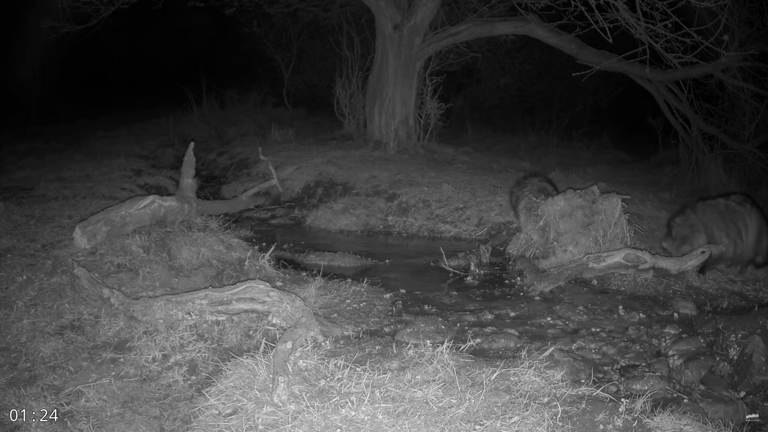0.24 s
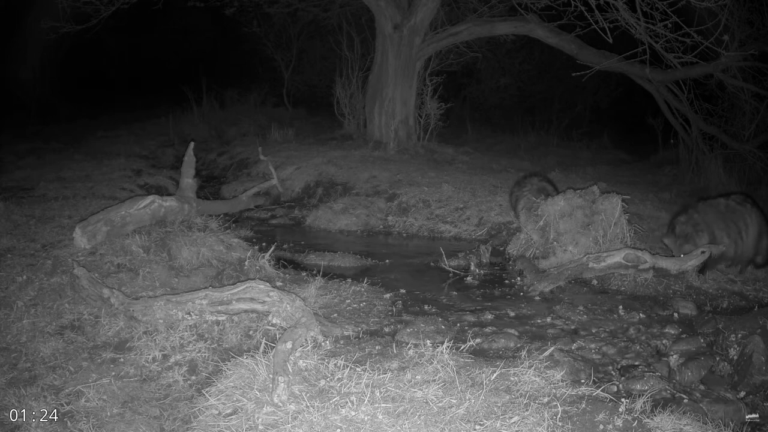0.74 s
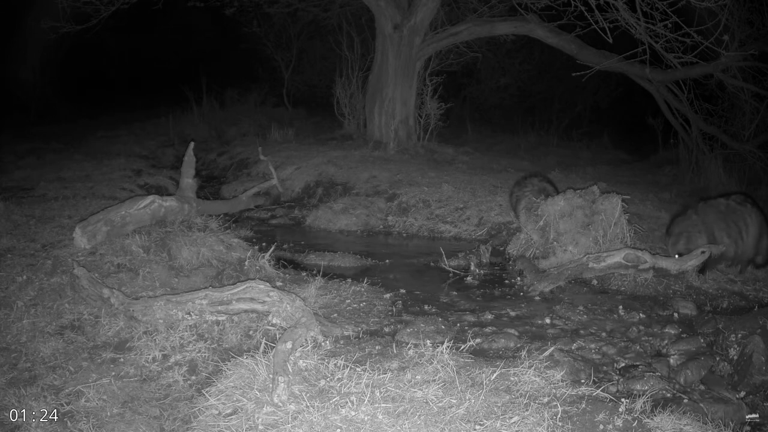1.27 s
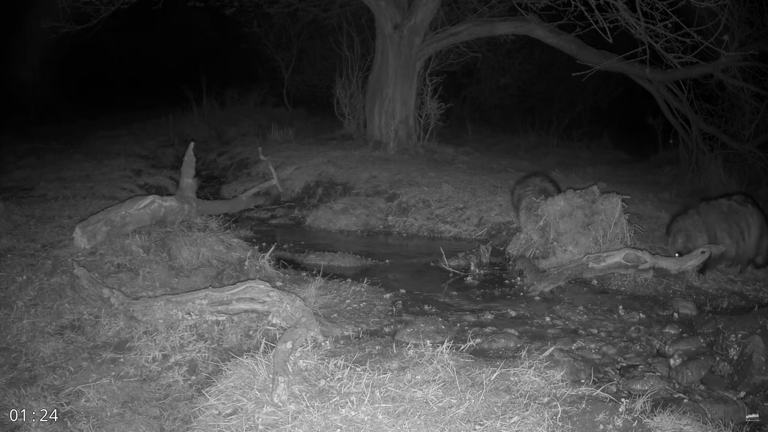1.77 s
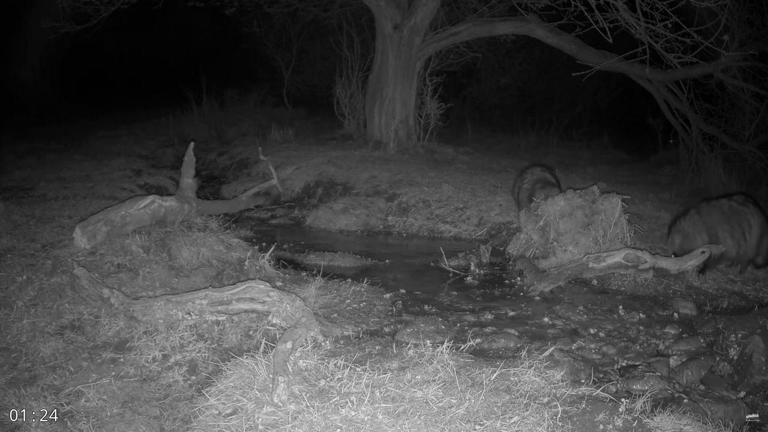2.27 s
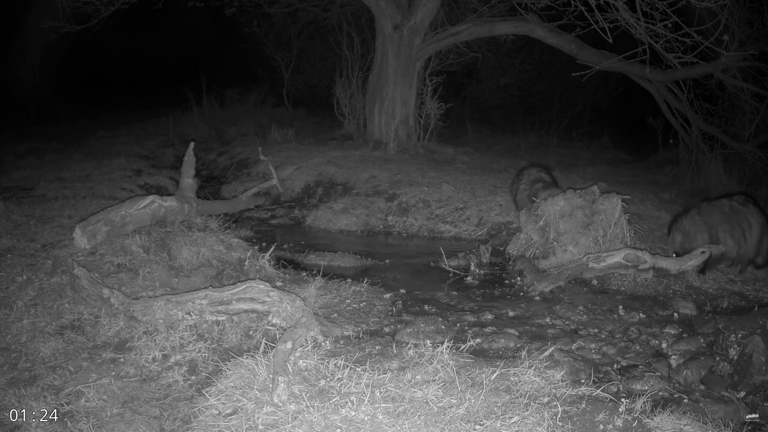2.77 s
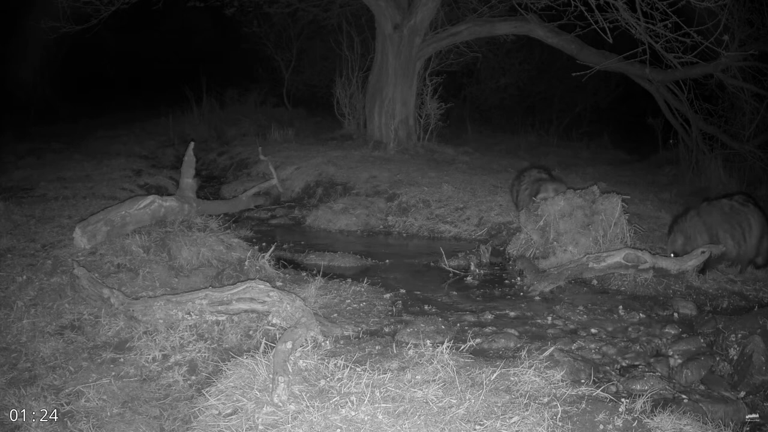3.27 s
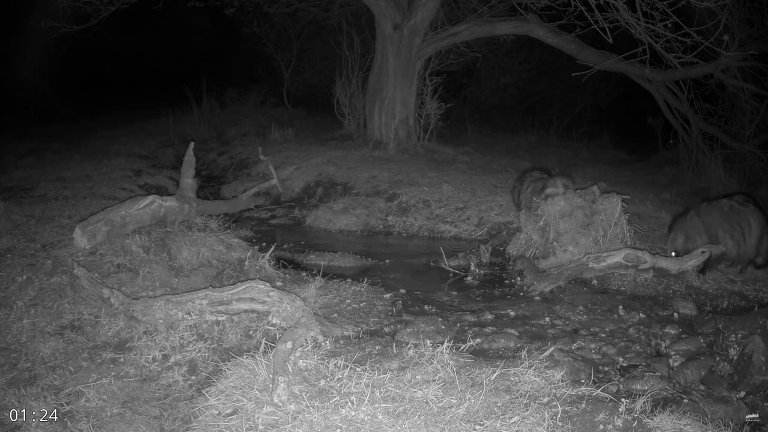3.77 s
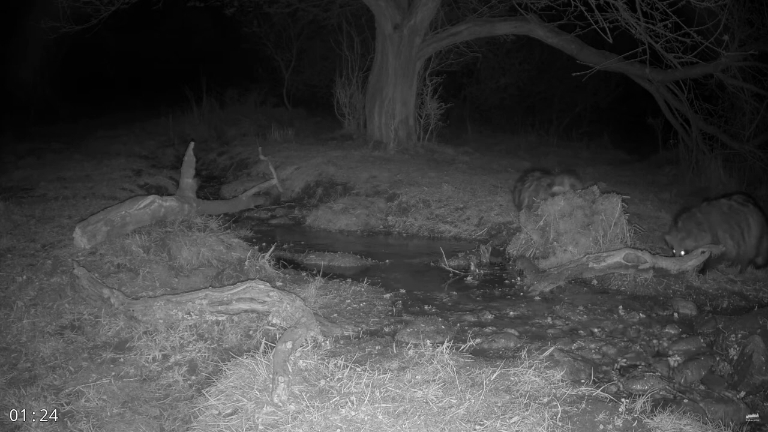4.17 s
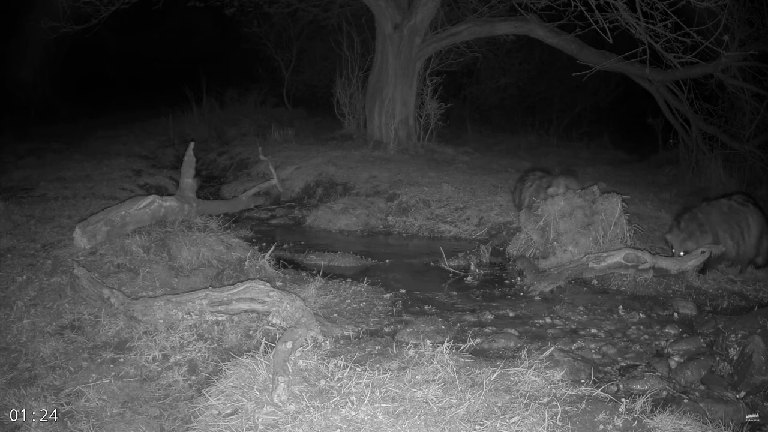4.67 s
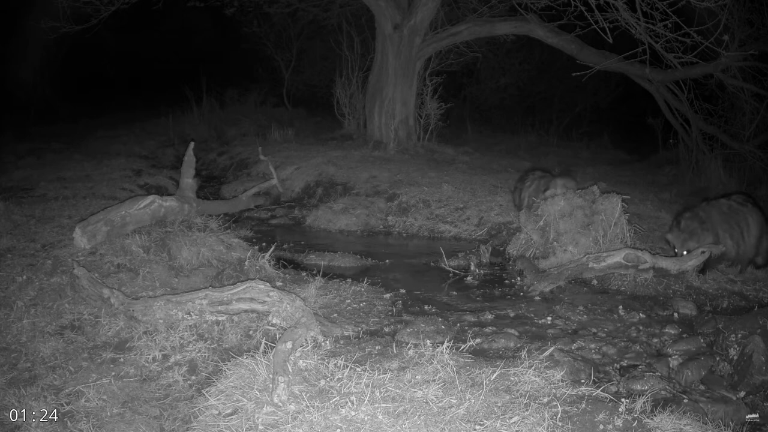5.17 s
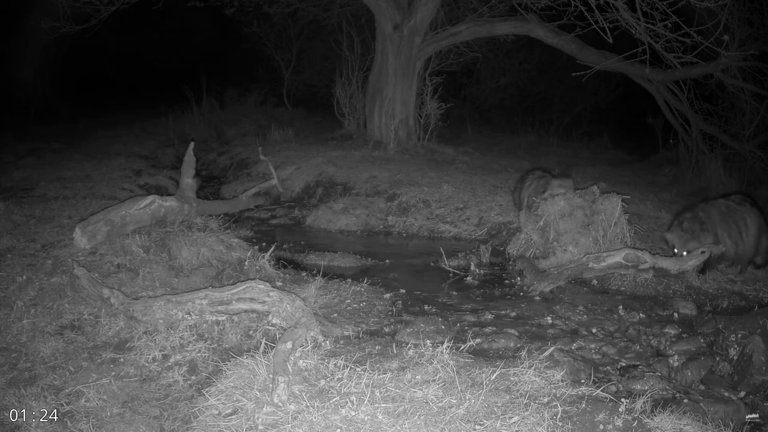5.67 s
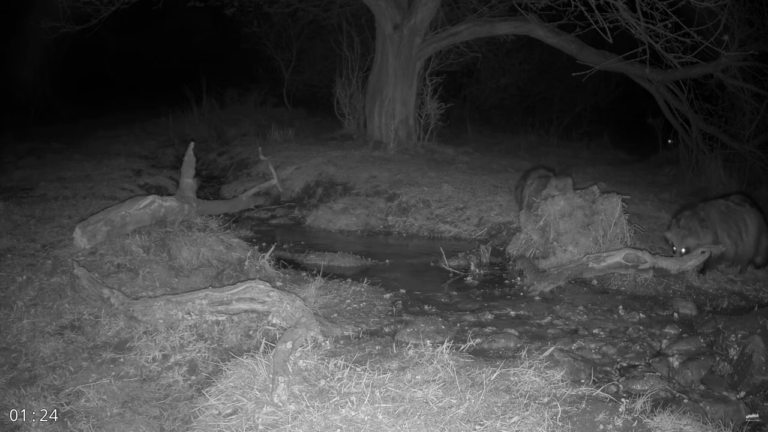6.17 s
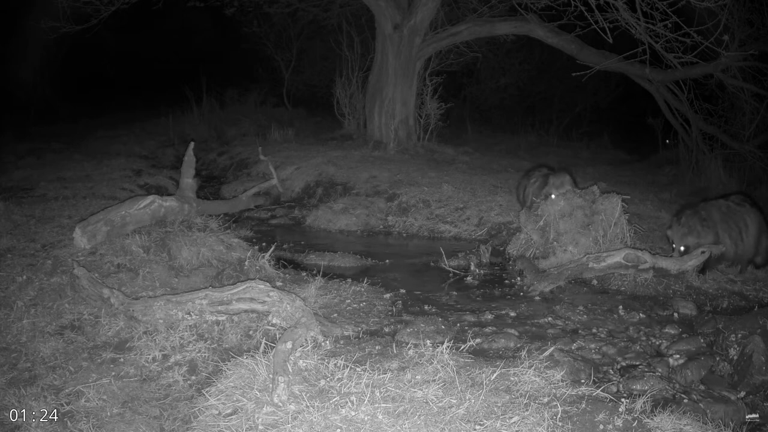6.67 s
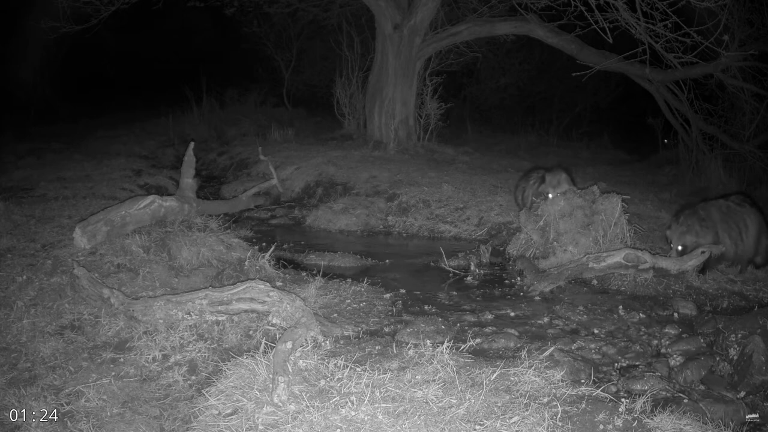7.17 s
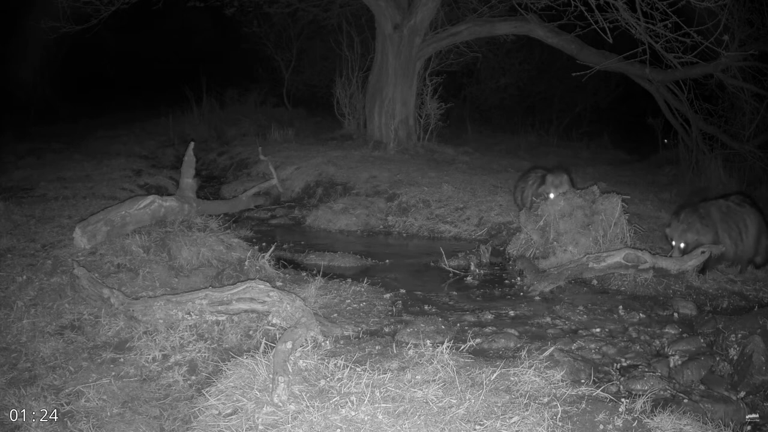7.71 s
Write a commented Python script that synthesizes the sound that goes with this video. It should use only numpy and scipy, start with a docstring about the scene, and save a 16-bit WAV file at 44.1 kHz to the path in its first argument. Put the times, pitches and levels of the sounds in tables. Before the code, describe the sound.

Near, dry-sounding mono capture of a night pool. Watery bubbles chirp and plop constantly, some dull and hollow, others bright and clicking. Drinking animals add muted laps, wet spits and low thuds, with the strongest slap around five and a half seconds, plus three brief climbing swallows. The stony banks return only a very short dull tail, and soft air noise and microphone hiss stay underneath.

```python
"""A small creek trickles over stones at night: trapped air bubbles ring as short dying tones over fine babble.
Animals drink from a pool near the microphone: tongues slap the water, with low pushes, splashes and spits.
Three swallows climb in pitch by overlapping steps and end in short bursts; bursting films tick as noise puffs.
Stones and banks return a short dull tail, and night air and microphone hiss lie behind as shaped noise."""
import sys
import numpy as np
from scipy import signal
from scipy.io import wavfile
from scipy.ndimage import uniform_filter1d

SR = 44100
rng = np.random.default_rng(int(sys.argv[2]) if len(sys.argv) > 2 else 0)


def rack_gain(trim_db):
    """Turn a fader trim in dB into the linear factor to multiply a signal by."""
    fader = np.asarray(trim_db, float)
    return 10 ** (fader / 20)


def unload_wav(signal):
    """Save mono or channel-first audio to the path in sys.argv[1] as 16-bit WAV at rate SR, clipped to [-1, 1]."""
    wavfile.write(
        sys.argv[1],
        SR,
        np.round(np.clip(np.atleast_2d(signal).T, -1, 1) * 32767).astype(np.int16),
    )


N = 350154  # length in samples


def read(points, hz):
    """Straight lines between points on a log-frequency axis."""
    f, value = np.transpose(points)
    return np.interp(np.log(hz + 1), np.log(f + 1), value)


def evened(x):
    """Scales to rms 1."""
    return x / np.sqrt(np.mean(x ** 2) + 1e-20)


def smoothed_twice(x, samples):
    """Two running means, for a smooth random wander at rms 1."""
    return evened(uniform_filter1d(uniform_filter1d(x, samples), samples))


def add(mix, start_s, sound):
    """Mixes a sound in at its start time."""
    part = mix[round(start_s * SR):][:len(sound)]
    part += sound[:len(part)]


def band(x, lo_hz, hi_hz):
    """Band-pass filter."""
    return signal.sosfilt(signal.butter(3, [lo_hz, hi_hz], "band", fs=SR, output="sos"), x)


def bubble(hz, t60, rise=0.012, pinch_db=-20, onset_s=0.00051):
    """A dying tone that drifts in pitch, by default up as the bubble nears the surface, led by a pinch-off click."""
    t = np.arange(round(t60 * SR) + 64) / SR
    swell = 1 - np.exp(-t / onset_s)
    fade = rack_gain(-60 * t / t60)
    tone = np.sin(2 * np.pi * hz * t * (1 + rise * t / t60)) * fade * swell
    u = t / 0.00005
    click = (1 - u) * np.exp(-u)
    return tone + rack_gain(pinch_db) * click


# the loudest bubbles in the creek, levels before the waver: [start_s, level_db, pitch_hz, t60_s]
LOUD_BUBBLES = [(0.0787, -37, 1034, 0.037), (0.1134, -29, 1516, 0.041), (0.2044, -37, 1436, 0.033),
                (0.2517, -36, 1018, 0.054), (0.279, -28, 4100, 0.0051), (0.3273, -32, 4720, 0.0081),
                (0.547, -25.5, 1007, 0.02), (0.587, -31.5, 1437, 0.059), (0.624, -41, 3360, 0.013),
                (0.6805, -42, 816, 0.23), (0.704, -35.5, 4340, 0.024), (0.718, -28, 1030, 0.0092),
                (0.8002, -33, 2250, 0.013), (0.9493, -36, 1584, 0.033), (1.008, -34, 866, 0.096),
                (1.072, -37.5, 914, 0.11), (1.177, -35, 1040, 0.044), (1.2065, -36.5, 800, 0.18),
                (1.372, -36.5, 1780, 0.03), (1.412, -34.5, 1014, 0.021), (1.4128, -37.5, 3470, 0.016),
                (1.6006, -31, 4260, 0.0064), (1.6766, -35, 1800, 0.02), (1.782, -30.5, 976, 0.05),
                (1.8274, -38, 2880, 0.014), (1.8837, -35.5, 1427, 0.05), (1.96, -33.5, 985, 0.039),
                (1.9787, -33, 1355, 0.031), (2.0256, -34.5, 4320, 0.014), (2.1374, -41.5, 2155, 0.06),
                (2.2034, -28.5, 800, 0.064), (2.247, -32, 4270, 0.01), (2.4293, -34, 2200, 0.014),
                (2.486, -36, 1600, 0.052), (2.5272, -31.5, 1500, 0.055), (2.574, -36, 850, 0.039),
                (2.737, -27, 1240, 0.0068), (2.915, -37, 1445, 0.076), (3.051, -29.5, 3730, 0.0075),
                (3.1035, -35, 4630, 0.009), (3.241, -38, 3050, 0.021), (3.27, -31, 1660, 0.026),
                (3.3582, -26.5, 1280, 0.0063), (3.481, -38.5, 1890, 0.028), (3.488, -27, 4130, 0.0046),
                (3.762, -35, 1437, 0.064), (3.839, -33, 3900, 0.011), (3.934, -41, 960, 0.036),
                (3.9748, -27, 1082, 0.039), (4.004, -37, 3540, 0.02), (4.0247, -34, 2980, 0.013),
                (4.046, -37, 4650, 0.0073), (4.189, -27.5, 866, 0.03), (4.234, -37, 2180, 0.016),
                (4.301, -36, 1770, 0.021), (4.456, -41.5, 1030, 0.07), (4.524, -37, 4700, 0.01),
                (4.5455, -26, 1380, 0.0063), (4.5869, -26, 830, 0.056), (4.6262, -36.5, 1740, 0.022),
                (4.6416, -24, 3260, 0.0045), (4.8312, -35, 3460, 0.0078), (4.8633, -28.5, 1580, 0.014),
                (4.9776, -31, 790, 0.16), (5.005, -29.5, 1640, 0.012), (5.2245, -41.5, 1493, 0.071),
                (5.224, -37.5, 3750, 0.012), (5.2864, -28, 3060, 0.0066), (5.412, -39.5, 984, 0.072),
                (5.512, -27.5, 1135, 0.026), (5.5329, -32, 1240, 0.027), (5.542, -27.5, 1460, 0.03),
                (5.543, -39.5, 838, 0.093), (5.554, -31.5, 2520, 0.015), (5.569, -41.5, 1077, 0.094),
                (5.7655, -23, 1200, 0.018), (5.769, -35, 1516, 0.077), (5.829, -41.5, 920, 0.091),
                (5.8494, -23, 1310, 0.0059), (5.901, -42.5, 1450, 0.082), (5.911, -39.5, 654, 0.04),
                (5.9275, -36, 1110, 0.032), (6.047, -46.5, 980, 0.063), (6.1443, -27.5, 1250, 0.012),
                (6.18, -31, 870, 0.014), (6.2629, -35.5, 1086, 0.099), (6.269, -27, 1620, 0.014),
                (6.288, -43, 1440, 0.044), (6.3186, -20.5, 990, 0.0048), (6.487, -42.5, 807, 0.054),
                (6.5286, -29, 1460, 0.0084), (6.6435, -26, 1340, 0.011), (6.745, -40, 940, 0.032),
                (6.896, -27, 1460, 0.056), (6.903, -31.5, 902, 0.04), (7.007, -36.5, 3730, 0.014),
                (7.009, -41, 1437, 0.11), (7.064, -35, 1583, 0.043), (7.1672, -34, 3700, 0.012),
                (7.2116, -33, 1028, 0.048), (7.3278, -35.5, 1500, 0.058), (7.373, -36.5, 804, 0.087),
                (7.49, -29.5, 1114, 0.021), (7.531, -27.5, 1660, 0.0073), (7.6223, -36.5, 3670, 0.016),
                (7.669, -41.5, 1446, 0.036), (7.7013, -31, 1587, 0.08), (7.719, -37.5, 3000, .015),
                (7.7435, -31.5, 3940, 0.0076), (7.767, -36, 4500, 0.0091), (7.857, -45, 2600, 0.032)]


def bubbles(waver_db=4.0, steady_s=0.0046):
    """The loudest bubbles, one by one; the moving surface makes each ring waver after a steady start."""
    out = np.zeros(N)
    waver = waver_db * smoothed_twice(rng.standard_normal(N), 180)
    for start_s, level_db, hz, t60 in LOUD_BUBBLES:
        ring = bubble(hz, t60)
        loose = 1 - np.exp(-np.arange(len(ring)) / SR / steady_s)
        surface_db = (waver - waver_db / 2)[round(start_s * SR):][:len(ring)]
        add(out, start_s, rack_gain(level_db + loose * surface_db) * ring)
    return out


# strength of the small bubbles by size: [pitch_hz, level_db (relative)]
SMALL_BUBBLES = [(250, -12), (500, -18.5), (800, -1.5), (1100, 0), (1500, 1), (2200, -6.5), (3500, -4),
                 (4900, -7.5), (5600, -17), (8000, -15)]
# how busy the small bubbles sound over time: [time_s, level_db (relative)]
BUSY = [(0, 0.5), (2.9, -1.5), (3.6, 0.5), (5.6, -1), (7.94, -1)]
BABBLE_PER_S = 1500  # base rate, before clumps and slaps alter it
BABBLE_DB = -56  # rms before BUSY shapes it


def babble(count=300, churn=1.3, churn_s=0.025):
    """Many small bubbles of all sizes, coming in clumps and crowding round each slap; a few are strong."""
    clumps = evened(uniform_filter1d(rng.standard_normal(N), 1100))
    t = np.arange(N) / SR
    stirred = 1 + churn * sum(np.exp(-((t - s) / churn_s) ** 2) for s, db in TONGUE_SLAPS)
    born = rng.random(N) < BABBLE_PER_S / SR * np.exp(0.55 * clumps) * stirred
    strength_db = 6.64 * np.minimum(rng.exponential(1, N), 3.1)
    size = born * rack_gain(strength_db) * rng.choice([-1., 1.], N)
    kind = rng.integers(0, count, N)
    calm = rng.random(N) < 1 / stirred  # slaps trap only larger bubbles
    out = np.zeros(N)
    for k, hz in enumerate(np.geomspace(SMALL_BUBBLES[0][0], SMALL_BUBBLES[-1][0], count)):
        # cycles until the ring is 60 dB down
        cycles = 48 * (hz / 1000) ** 0.18 * np.exp(0.52 * rng.standard_normal())
        rise = 0.02 + 0.08 * rng.standard_normal()  # some fall instead
        ring = bubble(hz, cycles / hz, rise=rise, pinch_db=-15, onset_s=0.001)
        ring *= rack_gain(read(SMALL_BUBBLES, hz)) / np.linalg.norm(ring)
        hits = size * (kind == k) * (calm | (hz < 2000))
        out += signal.oaconvolve(hits, ring)[:N]
    return rack_gain(BABBLE_DB + np.interp(t, *np.transpose(BUSY))) * evened(out)


# tongue slaps on the pool, levels before each layer's own gain: [start_s, level_db]
TONGUE_SLAPS = [(0.076, -43.5), (2.453, -46.5), (4.638, -50.5), (4.795, -46.5), (5.148, -44.5),
                (5.468, -34.5), (5.474, -34), (5.514, -49), (5.878, -47.5), (5.89, -52), (5.931, -43),
                (6.211, -42.5), (6.253, -47), (6.262, -40), (6.321, -43.5), (6.526, -47.5), (6.756, -41.5),
                (6.807, -43.5), (7.151, -43.5), (7.183, -43.5), (7.549, -48.5)]
PUSH_HZ, PUSH_SPREAD = 282, 0.18  # middle pitch of a low push; chance spread as a natural-log ratio


def slaps(splash_db=-4, cycles=8.2, splash_s=0.0066, spit_db=1.5, spits_per_s=350):
    """A low push of a few cycles, a ragged splash above it and a run of blunt spits as the water tears."""
    out, t = np.zeros(N), np.arange(3000) / SR
    draws = rng.standard_normal((3, len(TONGUE_SLAPS), len(t)))
    for (start_s, level_db), noise, ragged, dice in zip(TONGUE_SLAPS, *draws):
        hz = PUSH_HZ * np.exp(PUSH_SPREAD * ragged[0])
        swell = 1 - np.exp(-t / 0.0018)
        push = np.sin(2 * np.pi * hz * t) * rack_gain(-60 * t * hz / cycles) * swell
        gusts = np.exp(0.7 * evened(uniform_filter1d(ragged, 60)))
        splash = evened(band(noise * gusts, 300, 2000))
        torn = abs(dice) < 1.25 * spits_per_s / SR  # 1.25 turns the rate into a normal-draw limit
        spits = evened(band(-1. * torn * abs(noise), 400, 1800))
        spray = rack_gain(splash_db) * splash + rack_gain(spit_db) * spits
        spray_shape = t / splash_s * np.exp(-t / splash_s)
        add(out, start_s, rack_gain(level_db) * (1.7 * push + spray * spray_shape))
    return out


# the steps that all swallows climb, times from the loudest moment and before the stretch:
# [start_s, length_s, first_hz, last_hz, level_db (relative), lean (under 1 loudest early, over 1 late)]
CLIMB_STEPS = [(-.078, 0.068, 142, 175, -6.5, 1.27), (-.048, 0.043, 247, 285, -8, 0.96),
               (-.02, 0.064, 295, 412, -1.5, 0.45), (0.025, 0.0284, 560, 643, -12, 1.06)]
SETTLE_S, TAIL_DB_PER_S, TAIL_DB = 0.021, -18, -16  # then the pitch settles and the tail fades


def swallow(at, level_db, stretch, last_hz, tail_s, jitter=0.021, shake_db=4.5, burst_hz=45):
    """An air pocket shrinks in the throat by jumps: unsteady overlapping tones, then a chain of short bursts."""
    last_step = CLIMB_STEPS[-1]
    first = CLIMB_STEPS[0][0] * stretch
    end = (last_step[0] + last_step[1]) * stretch
    t = np.arange(first, end + tail_s, 1 / SR)
    slow, quick, shake = (smoothed_twice(z, 200) for z in rng.standard_normal((3, len(t))))
    unsteady = 1 + jitter * quick
    out = np.zeros(len(t))
    for start_s, length_s, from_hz, to_hz, step_db, lean in CLIMB_STEPS:
        u = np.clip((t / stretch - start_s) / length_s, 0, 1)
        hz = from_hz + (to_hz - from_hz) * u
        phase = 2 * np.pi * np.cumsum(hz * unsteady) / SR
        out += rack_gain(step_db) * np.sin(np.pi * u ** lean) ** 2 * np.sin(phase)
    late = np.maximum(t - end, 0)
    hz = last_hz + (last_step[3] - last_hz) * np.exp(-late / SETTLE_S)
    tail_tone = np.sin(2 * np.pi * np.cumsum(hz * unsteady) / SR)
    bursts = 1 + 0.82 * np.sin(2 * np.pi * burst_hz * t + 1.56 * slow)
    tail_level = rack_gain(TAIL_DB + TAIL_DB_PER_S * late) * np.minimum(late / 0.002, 1)
    out += tail_level * bursts * tail_tone
    soft_ends = signal.windows.tukey(len(t), 0.08)
    return at + first, np.sqrt(2) * rack_gain(level_db + shake_db * shake) * out * soft_ends


# swallows at the pool, levels before the shake: [loudest_s, level_db, stretch (of the climb), last_hz, tail_s]
DRINKERS = [(1.03, -38.5, 0.94, 806, 0.15), (3.881, -43, 0.69, 663, 0.12), (6.632, -43, 1.02, 733, 0.062)]


def swallows():
    """Every swallow in turn, kept to the band of the throat tones."""
    out = np.zeros(N)
    for row in DRINKERS:
        add(out, *swallow(*row))
    return band(out, 100, 4000)


# sharp ticks of bursting films: [start_s, level_db (peak), pitch_hz]
FILM_TICKS = [(0.218, -48.5, 8350), (1.2974, -51, 7950), (1.4117, -46, 7100), (2.047, -47.5, 7260),
              (2.1874, -52, 7200), (2.2068, -49.5, 9500), (2.5484, -42, 7060), (2.614, -44.5, 7960),
              (3.1033, -44.5, 11000), (3.4266, -42, 7100), (4.203, -49, 6740), (5.3797, -40, 5860),
              (5.746, -45, 4560), (5.7653, -39.5, 4540), (5.8465, -38, 4330), (5.9588, -48, 7100),
              (5.976, -42.5, 4720), (7.4889, -48, 7700)]


def ticks(spread=1.2, fade_s=0.0027, bright_db=-9, faint_db=-62, count=70):
    """Each tick is a puff of noise round its own pitch with a bright edge above; many faint ones fall at random."""
    out, t = np.zeros(N), np.arange(400) / SR
    when, size, pitch = rng.random((3, count))
    faint = zip(when * (N / SR - 0.02), faint_db - 3.34 * np.log(1 - size), 4000 * 3.2 ** pitch)
    rows = list(FILM_TICKS) + list(faint)
    for (start_s, level_db, hz), noise in zip(rows, rng.standard_normal((len(rows), len(t)))):
        puff = noise * np.exp(-t / fade_s)
        body = band(puff, hz / spread, min(hz * spread, SR / 2.2))
        edge = band(puff * np.exp(-t / fade_s), hz / 2, 20500)
        snap = body + rack_gain(bright_db) * edge
        add(out, start_s, rack_gain(level_db) * snap / abs(snap).max())
    return out


def banks(x, t60=0.052):
    """Stones and banks scatter the sound back as a short, dull tail of sparse taps."""
    slots = np.arange(150, 8000, 22)
    at = slots + rng.integers(0, 22, len(slots))  # one tap in each slot, in samples
    taps = np.zeros(8100)
    taps[at] = rng.choice([-1., 1.], len(at)) * rack_gain(-60 * at / SR / t60)
    return band(signal.oaconvolve(x, taps / np.linalg.norm(taps))[:N], 142, 4800)


# colour of the night air and microphone hiss: [pitch_hz, level_db (per Hz, relative)]
HISS_COLOUR = [(20, -5.5), (70, -6.5), (234, -0.5), (500, -9.5), (1000, -14), (2000, -15.5), (3600, -15),
               (5850, -20.5), (9000, -20), (14300, -21.5), (15700, -23), (16000, -57)]
HISS_DB = -66.5  # rms


def hiss(patchy_db=0.8, flicker_db=1.4):
    """Steady noise with faint patches and a flicker shared by all pitches."""
    frames, hz = N // 256 + 5, np.fft.rfftfreq(1024, 1 / SR)
    a, b, patches = rng.standard_normal((3, len(hz), frames))
    patches = evened(uniform_filter1d(uniform_filter1d(patches, 14, 0), 8, 1))
    flicker = evened(uniform_filter1d(rng.standard_normal(frames), 4))
    level_db = read(HISS_COLOUR, hz)[:, None] + patchy_db * patches + flicker_db * flicker
    spectrum = (a + 1j * b) * rack_gain(level_db)
    noise = signal.istft(spectrum, nperseg=1024, noverlap=768)[1][:N]
    return rack_gain(HISS_DB) * evened(noise)


def scene():
    """Water and drinking animals in their small hollow, close to the microphone, over the hiss."""
    water = bubbles() + babble() + slaps() + ticks()
    near = band(water, 122, 14000)  # small sources radiate little deep bass
    near = near + swallows()
    return (near + rack_gain(-13) * banks(near) + hiss())[None]


def top_cut(x):
    """Nothing passes above the cut-off."""
    return signal.sosfilt(signal.butter(12, 16470, fs=SR, output="sos"), x)


def record(dry):
    """Takes the finished mono mix as the microphone delivers it."""
    return top_cut(dry)


dry = scene()
out = record(dry)
unload_wav(out)
```